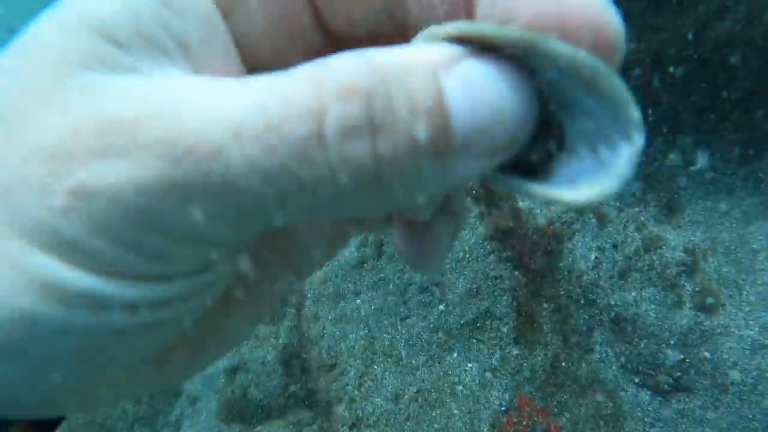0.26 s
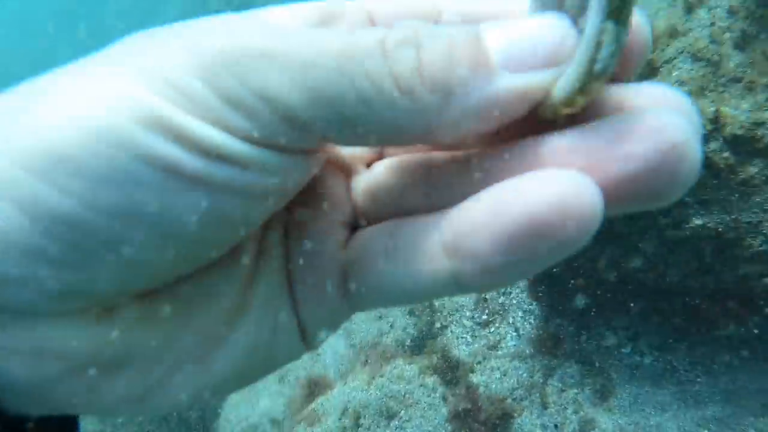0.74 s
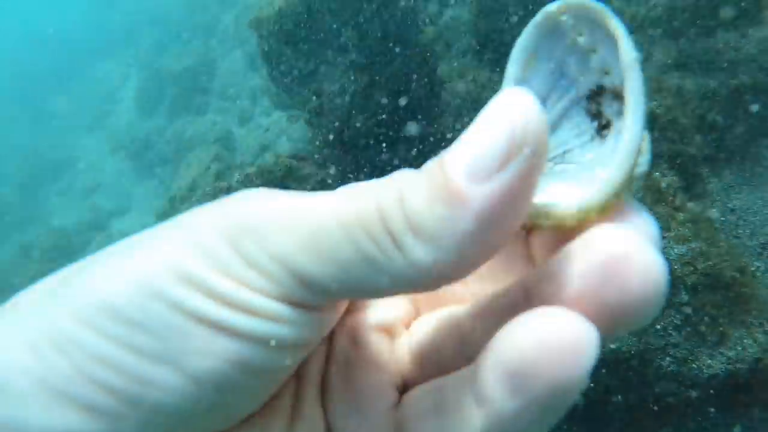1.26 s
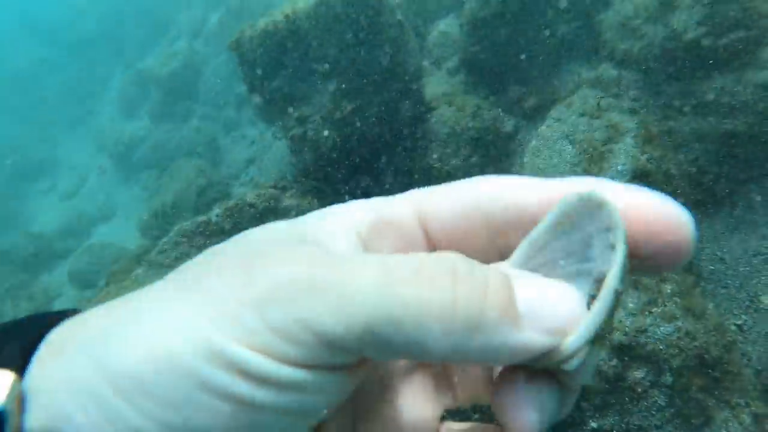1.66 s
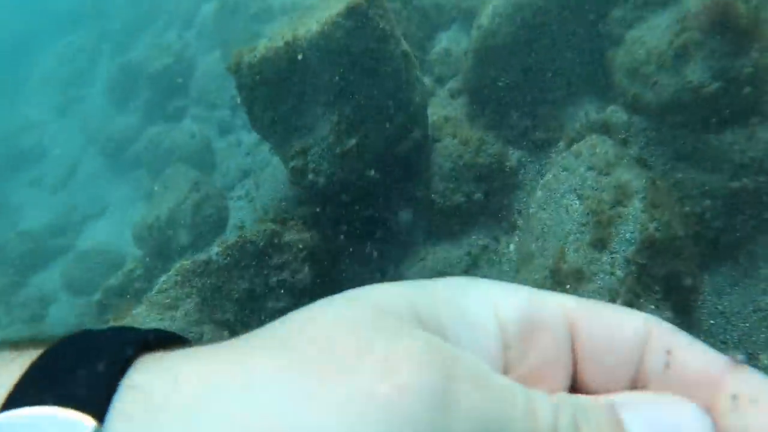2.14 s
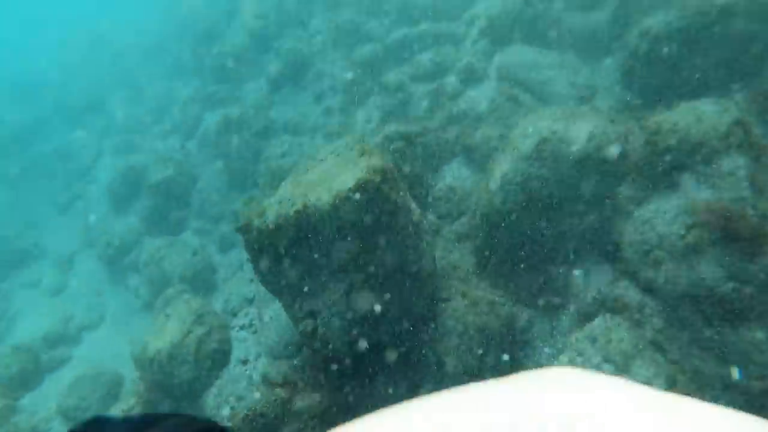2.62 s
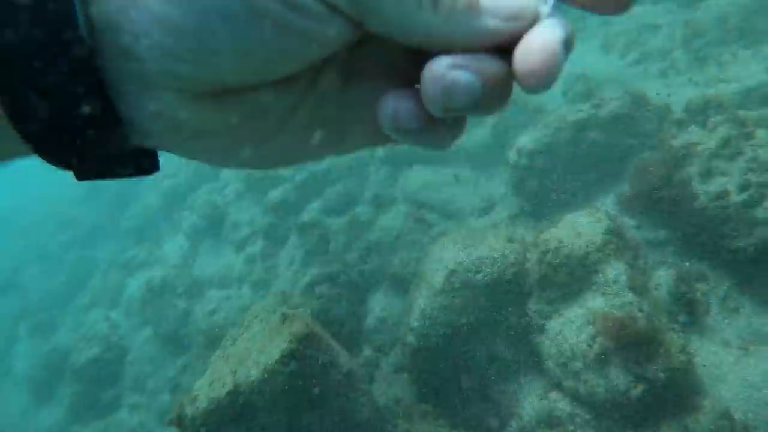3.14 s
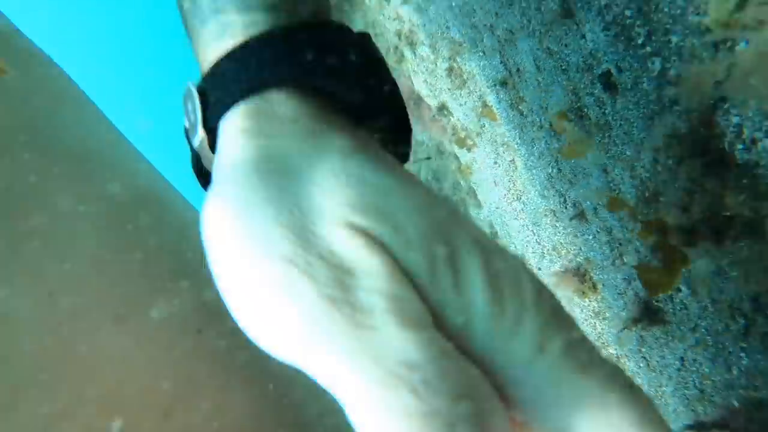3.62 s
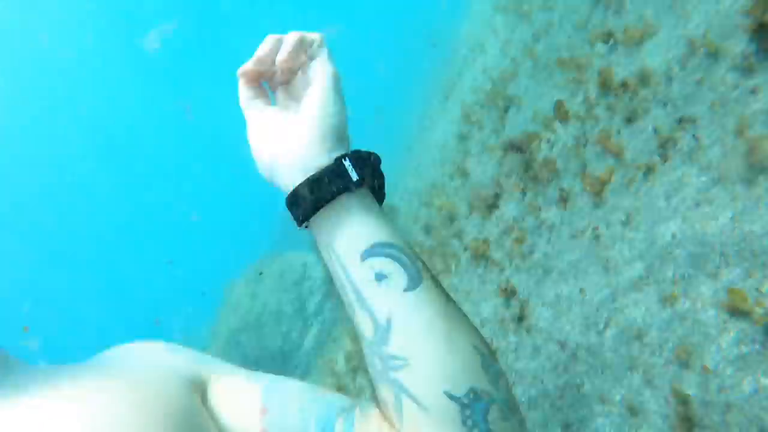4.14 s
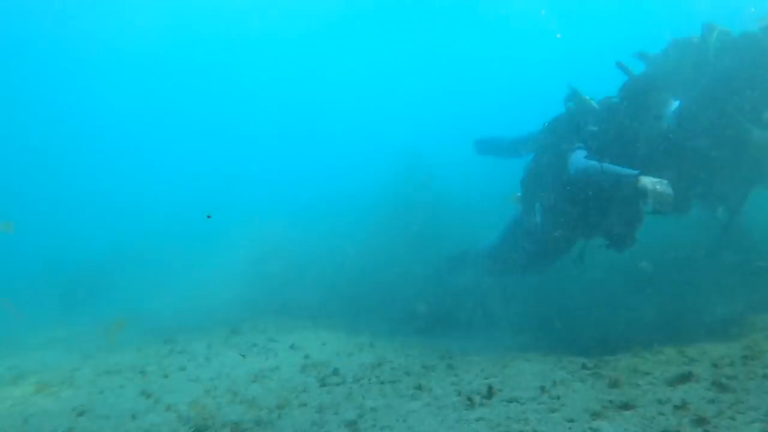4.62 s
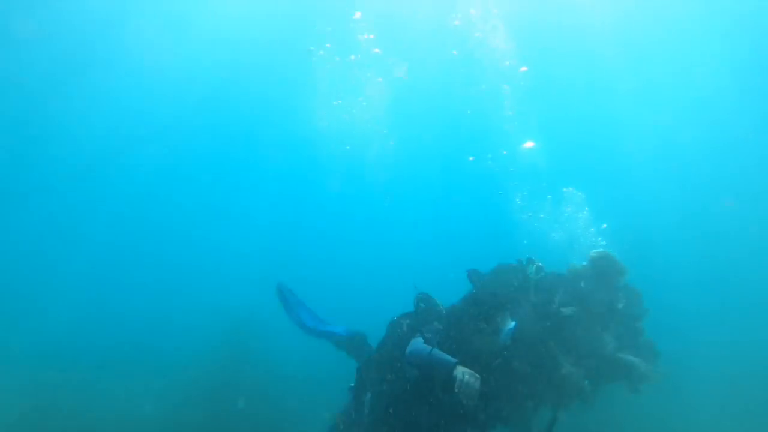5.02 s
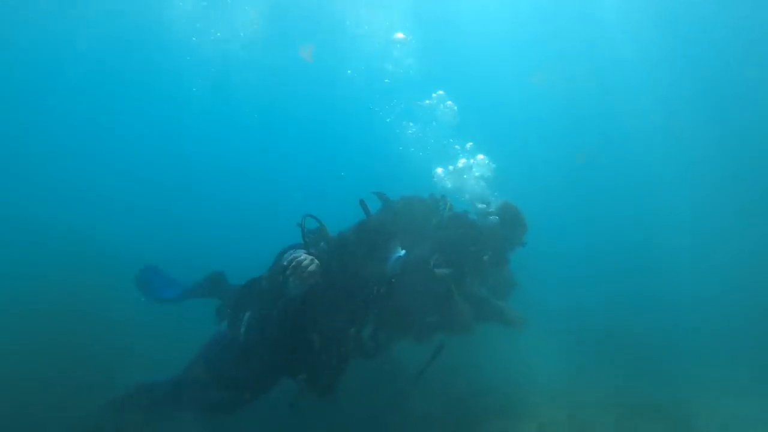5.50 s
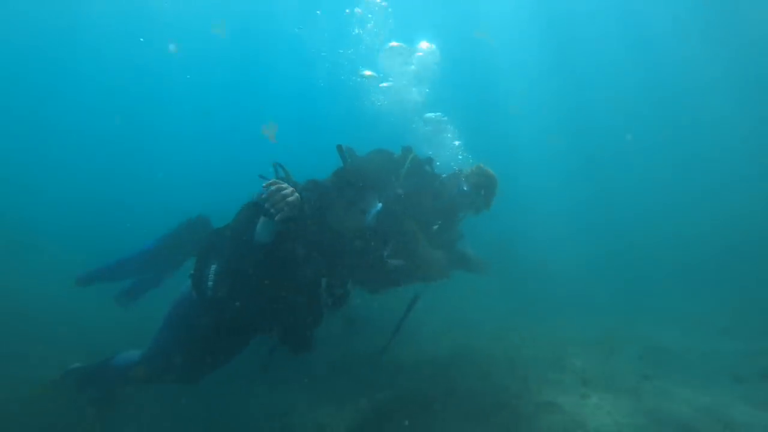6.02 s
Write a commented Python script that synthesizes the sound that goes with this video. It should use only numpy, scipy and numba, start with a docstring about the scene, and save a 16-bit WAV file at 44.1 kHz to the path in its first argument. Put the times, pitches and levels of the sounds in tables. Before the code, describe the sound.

Two joined underwater shots, both muffled and resonant. The first is quiet: low water buffeting, thin gurgle, dry little clicks and occasional hollow taps, booming more on the left. The second jumps up abruptly, leaning right, with thick bubbling, gritty scrapes, plopping bubble notes, a cluster of hard housing knocks late on, and a wavering distant drone.

```python
"""Water buffets the two flooded microphone ports of a hand-held camera in a rocky bay: noise whose low-pass
corner follows the flow. Two shots meet at a hard cut. Ringing sine bubbles, sharp snaps of noise grains, scrapes
of dense ticks and knocks on the housing come muffled through the ports, over a bed of bubble swarms; a far drone
joins in the second shot. One port keeps an air pocket that booms: the left one first, the right one after the cut.
"""
import sys
import numpy as np
from scipy import signal
from scipy.fft import rfft, irfft
from scipy.io import wavfile
from scipy.ndimage import uniform_filter1d
from numba import njit

SR = 44100
rng = np.random.default_rng(int(sys.argv[2]) if len(sys.argv) > 2 else 0)


def pcm_store(signal):
    """Save signal as 16-bit PCM."""
    levels = np.round(np.clip(np.atleast_2d(signal), -1, 1) * 32767)
    wavfile.write(sys.argv[1], SR, levels.astype(np.int16).T)


N = 276066

# Pairs of settings hold (first shot, second shot) unless noted.
CUT_S = 3.41227
JOIN_STEP = (-.022, -.073)  # sample value of (left, right) as the second shot starts

# Gusts of water over the ports: (start [s], hold [s], buffeting [dB], left minus right [dB])
FLOW_GUSTS = [(0.043, 0.17, -35.5, 34), (0.252, 0.074, -34.5, 34), (0.372, 0.026, -40, 27),
              (0.536, 0.044, -40.5, 10.5), (0.65, 0.11, -37.5, -6), (0.8, 0.031, -41, -10),
              (1.543, .03, -41, 7.5), (1.725, 0.058, -45, 9), (1.915, 0.021, -38.5, 8),
              (2.149, 0.26, -36, -9), (2.446, 0.13, -32, 5), (2.621, 0.08, -39.5, -8),
              (2.775, 0.05, -33.5, 6.5), (2.87, 0.086, -32, 10.5), (2.974, 0.23, -36, 3.5),
              (3.425, 0.024, -34.5, -10), (3.524, 0.072, -35.5, -8.5), (3.66, 0.11, -41, -10),
              (3.835, 0.099, -27.5, -30.5), (3.952, .012, -26.5, -30), (4.024, 0.027, -33, -15),
              (4.075, 0.028, -25, -42.5), (4.156, 0.05, -36, -17.5), (4.291, .38, -33.5, -24.5),
              (4.715, .25, -38.5, -28), (4.984, 0.032, -36, -14.5), (5.056, .04, -40, -18),
              (5.32, 0.025, -33, -9), (5.489, 0.087, -44.5, -11)]
# Flow between gusts, one row a shot: (buffeting [dB], left minus right [dB])
STILL_FLOW = [(-54, 9), (-52.5, -20)]
GUST_RISE_S, GUST_FALL_S = 0.024, 0.023  # time constants
FLOW_ALIKE = (0.41, 0.71)  # share of the buffeting power common to both ports

# Bed of bubbles, one table a shot: (time [s], gurgle [dB], large bubbles [dB], fizz [dB])
BUBBLE_BED = [
    [(0.0, -53.5, -59.5, -73), (0.3, -58, -64.5, -77.5), (0.9, -52.5, -64, -76), (1.5, -57, -60, -73.5),
     (1.9, -55, -53.5, -74), (2.3, -53, -66.5, -72), (2.8, -60.5, -57.5, -74.5), (3.15, -62.5, -62, -76.5),
     (3.4, -51.5, -67, -81.5)],
    [(3.42, -37, -44, -64), (3.78, -40.5, -49.5, -66), (4.3, -39.5, -42, -67.5), (4.7, -40.5, -47.5, -69.5),
     (5.2, -39, -49.5, -69.5), (5.5, -42, -47, -70.5), (5.8, -39, -47.5, -69.5), (6.26, -42, -39, -65.5)],
]
# Bursts on top of the bed: (start [s], hold [s], gurgle [dB], large bubbles [dB], fizz [dB])
BUBBLE_BURSTS = [(1.854, 0.1, -47, -55, -77.5), (3.887, 0.022, -45, -26, -75.5),
                 (4.05, 0.036, -52, -36, -70.5), (4.307, 0.021, -32, -33, -72.5),
                 (4.549, 0.055, -28.5, -29.5, -71), (5.002, 0.013, -47, -32, -72.5)]
BURST_RISE_S, BURST_FALL_S = 0.0058, 0.014  # time constants
# Brief dips in the level of bed and drone: (time [s], depth [dB], return [s])
LEVEL_DIPS = [(3.498, 9, 0.16), (3.894, 12.5, .15), (4.094, 19, 0.13), (4.668, 20.5, 0.26),
              (5.041, 18, 0.11), (5.346, 18.5, 0.15)]
DIP_FALL_S = 0.015
LARGE_APART_DB, FIZZ_APART_DB, GURGLE_APART_DB = -10.5, -4.5, -14  # part that reaches the ports unlike
POCKET_HISS_DB = (-100, -81)

# Patches of grainy crackle, as of sand and small bubbles scraping the housing:
# (start [s], length [s], level [dB], low edge [Hz], top edge [Hz])
SCRAPE_PATCHES = [(0.01, 0.023, -72, 1400, 5000), (0.289, 0.031, -75, 1490, 4800),
                  (0.476, 0.044, -77, 1390, 4520), (0.998, 0.079, -79, 1400, 6000),
                  (1.439, 0.029, -71, 1400, 4770), (1.925, 0.04, -74.5, 1370, 11000),
                  (1.499, 0.0039, -76, 2500, 12500), (2.085, 0.019, -74, 2020, 11000),
                  (2.304, 0.057, -74, 1400, 5500), (2.372, 0.035, -68.5, 1300, 9100),
                  (2.472, 0.026, -77, 1290, 4500), (3.415, 0.03, -63, 1200, 2500),
                  (3.424, 0.078, -80.5, 2600, 12000), (3.568, 0.03, -78, 1600, 6820),
                  (3.67, 0.016, -79, 2600, 12000), (3.727, 0.041, -86, 2690, 11140),
                  (3.805, 0.073, -72, 1490, 8800), (4.004, 0.026, -72.5, 1500, 6000),
                  (4.06, 0.0081, -79.5, 2590, 11000), (4.072, 0.003, -74.5, 4500, 14500),
                  (4.499, 0.056, -70, 1820, 10000), (4.574, 0.065, -76.5, 2000, 6000),
                  (5.004, 0.025, -57.5, 1100, 2700), (5.162, 0.0083, -80.5, 2600, 10900)]
SCRAPE_TICKS_PER_S, SCRAPE_APART_DB, SCRAPE_FALL_S = 600, -1, 0.007
SCRAPE_LEAN_DB = (0.5, -3.5)  # left minus right

# Single bubbles: (time [s], peak [dB], middle pitch [Hz], length [s], played no shorter than 0.008)
SINGLE_BUBBLES = [(0.166, -48.5, 1240, 0.019), (1.005, -41, 946, 0.017), (1.159, -42, 597, 0.051),
                  (1.784, -38, 680, 0.012), (1.85, -38.5, 600, 0.04), (1.9, -37.5, 604, 0.041),
                  (1.955, -40.5, 510, 0.012), (1.996, -49.5, 990, 0.031), (1.33, -51.5, 945, 0.021),
                  (1.73, -43.5, 910, 0.0061), (1.85, -48.5, 1290, 0.011), (1.925, -48.5, 904, 0.03),
                  (2.0, -51, 1420, 0.014), (3.455, -39, 797, 0.053), (3.57, -37.5, 698, 0.043),
                  (3.678, -35.5, 707, .03), (3.732, -31, 701, 0.075), (4.03, -34, 603, 0.026),
                  (4.222, -41.5, 1016, 0.035), (4.64, -38, 1144, 0.024), (4.414, -32.5, 620, 0.028),
                  (4.484, -30.5, 524, 0.038), (4.893, -29, 560, 0.03), (4.912, -33, 593, 0.018),
                  (4.94, -62, 1400, 0.022), (5.025, -27, 685, 0.015), (5.18, -27, 843, 0.013),
                  (5.208, -33, 676, 0.066), (5.266, -32.5, 705, 0.038), (4.635, -27.5, 659.4, 0.05),
                  (4.976, -28, 654, 0.021), (5.01, -27.5, 451, 0.037), (5.164, -29.5, 719, 0.047),
                  (5.598, -28.5, 636, 0.071), (5.729, -34, 660, 0.045), (5.863, -38.5, 678, 0.03),
                  (5.909, -35, 642, 0.061), (5.948, -31.5, 640, 0.039), (6.171, -31, 639, 0.053)]
# Sharp snaps, and bright cracks of some knocks: (time [s], crack peak [dB], ring peak [dB])
SHARP_SNAPS = [(0.255, -60, -46.5), (0.2923, -49, -67), (0.414, -64, -45.5), (0.4882, -58.5, -63),
               (0.54, -60.5, -44.5), (0.6553, -55.5, -53), (0.7847, -63.5, -40.5), (0.818, -61, -42),
               (0.8626, -61.5, -37), (0.9061, -55.5, -43), (1.033, -60, -61), (1.0456, -52, -38),
               (1.088, -53, -37.5), (1.2262, -55.5, -48), (1.2743, -52.5, -35), (1.3028, -47.5, -35.5),
               (1.438, -77, -40.5), (1.4731, -61, -52), (1.499, -68, -44), (1.6373, -55, -41),
               (1.8174, -60.5, -40.5), (2.0839, -55, -64), (2.1233, -58, -53), (2.2515, -71, -52),
               (2.3171, -54.5, -63), (2.375, -57, -62), (2.41, -62, -53), (2.5194, -58.5, -58),
               (2.585, -53, -43), (2.6236, -58, -48), (2.6795, -62.5, -58), (2.739, -57, -55.5),
               (2.7943, -71, -61), (2.8406, -62, -52), (2.8801, -64, -49), (2.9769, -55.5, -41),
               (3.125, -65.5, -62.5), (3.1725, -62.5, -66), (3.2866, -64, -58), (3.3046, -63.5, -56),
               (3.3714, -63.5, -60), (3.488, -67, -40), (3.4965, -52, -38), (5.854, -58, -37),
               (6.009, -55, -49), (6.082, -49.5, -32)]
# Knocks on the housing: (time [s], ring peak [dB], thump peak [dB], crack peak [dB])
HOUSING_KNOCKS = [(0.321, -33.5, -40, -72), (1.108, -27, -53.5, -61), (1.524, -28.5, -41.5, -71),
                  (1.563, -26, -43, -81), (3.4958, -16.5, -20.5, -39), (3.816, -34, -37, -58),
                  (3.96, -27.5, -42, -71.5), (4.22, -35, -49, -80), (4.295, -27, -32, -75),
                  (4.466, -27, -42, -67), (4.559, -18.5, -71, -45), (4.829, -35.5, -44.5, -58),
                  (4.896, -44, -49, -68.5), (5.002, -20.5, -34, -49.5), (5.269, -24.5, -40, -88),
                  (5.299, -13.5, -25, -44.5), (5.32, -16.5, -37.5, -56), (5.338, -15, -27.5, -86)]
THUMP_HZ, THUMP_DROP_HZ, THUMP_DROP_S = 122, 89, 0.0035  # starts higher and sags to its pitch
# Far drone that wavers, second shot: (time [s], level [dB])
FAR_DRONE = [(3.42, -51.5), (3.9, -49), (4.25, -46.5), (5.0, -47.5), (5.55, -47.5), (5.75, -55.5),
             (5.9, -45), (6.26, -40.5)]

# Colour of what the water carries, one table a shot: (frequency [Hz], level [dB])
WATER_COLOUR = [
    [(100, 17), (400, 2.5), (700, -3), (1250, -2.5), (1550, -4.5), (1900, 0), (2200, -7.5), (4000, 3),
     (6500, 0), (8500, -2.5), (14000, -22.5)],
    [(100, -2.5), (400, 9), (700, -8), (1450, -6.5), (1900, -5), (2250, -10.5), (3000, -17), (4500, -5),
     (12000, -4.5), (14500, -22)],
]
# Port resonances, one row a shot: (membrane [Hz], its Q when flooded, its Q with pocket,
# pocket [Hz], Q, pocket level [dB], pocket lag [s], direct level [dB], whistle [Hz], Q, whistle level [dB],
# corner above which the flooded port goes dull [Hz], Q, treble that leaks past [dB])
PORT_RESONANCES = [(980, 12.5, 6.8, 600, 4.2, 12.5, 0.00018, -1, 2494, 29, 11.5, 4060, 0.87, -6),
                   (990, 9.6, 6.4, 687.8, 10.3, 11.5, 0.00012, 3, 2400, 7.8, 1.5, 4120, 1.58, -18.5)]
LEAK_HZ, LEAK_Q = 10000, 5  # thin ring of the flooded port
TOP_HZ = 16000


def undb(db):
    """Amplitude from dB."""
    return 10 ** (np.asarray(db) / 20)


def curves(table):
    """Columns of a table, joined by straight lines."""
    s, *columns = np.transpose(table)
    return [np.interp(np.arange(N) / SR, s, c) for c in columns]


def in_shot(table, shot):
    """Rows of a table that fall in one shot."""
    return [row for row in table if (row[0] > CUT_S) == shot]


def band(x, lo, hi):
    """Butterworth band-pass."""
    return signal.sosfilt(signal.butter(3, (lo, hi), "bandpass", fs=SR, output="sos"), x)


def unit(x):
    """Scales a sound to rms 1."""
    return x / np.sqrt(np.mean(x ** 2))


def add(out, s, grain):
    """Mixes a grain in at a time in seconds."""
    i = int(s * SR)
    out[i:i + len(grain)] += grain[:N - i]


def walk(rate):
    """Random levels held 1 / rate s and slewed twice."""
    k = int(SR / rate)
    steps = np.repeat(rng.standard_normal(N // k + 1), k)
    return uniform_filter1d(uniform_filter1d(steps, k), k)[:N]


def heavy(u):
    """Exponential chance from uniform chance, with the rarest giants cut off."""
    return np.minimum(-np.log(1 - u), 3.5)


def ticks(rate, scatter_db):
    """Random impulses, most small and a few large."""
    when, size, sign = rng.random((3, N))
    return unit((when < rate / SR) * undb(scatter_db * heavy(size)) * np.sign(sign - .5))


def swell(start, hold, rise, fall):
    """Gain of one event: grows up to its start, holds, dies away."""
    t = np.arange(N) / SR - start
    return np.exp(np.minimum(t, 0) / rise - np.maximum(t - hold, 0) / fall)


def heard(source, pair, lo, hi, peak=False):
    """Scales a source so that the middle of what the ports pass has rms 1 (or peak 1) in a band."""
    mid = band(signal.fftconvolve(source, pair.mean(axis=0)), lo, hi)
    level = np.abs(mid).max() if peak else np.sqrt(np.mean(mid ** 2))
    return source / level


def apart(x, db):
    """A spread-out crowd: a share of it differs between the ports."""
    return x + undb(db) * np.roll(x, N // 3) * np.array([[1], [-1]])


def split(mid_db, pan_db, alike):
    """Power at (left, right) of a flow with this middle level and lean."""
    left = 1 / (1 + undb(-2 * pan_db))
    shares = np.array([[left], [1 - left]])
    return 4 * undb(2 * mid_db) * shares / (1 + 2 * alike * np.sqrt(left * (1 - left)))


@njit
def lowpass(x, hz, damp):
    """State-variable low-pass whose corner moves."""
    y, b, l = np.empty(len(x)), 0., 0.
    for i in range(len(x)):
        g = np.tan(np.pi * hz[i] / SR)
        v = (b + g * (x[i] - l)) / (1 + g * (g + damp))
        y[i] = l + g * v
        b, l = 2 * v - b, l + 2 * g * v
    return y


def flow(shot):
    """Eddies shed unevenly at each port; stronger flow sheds smaller, brighter eddies."""
    alike = FLOW_ALIKE[shot]
    power = split(*STILL_FLOW[shot], alike)
    for s, hold, db, pan_db in FLOW_GUSTS:
        power = power + split(db, pan_db, alike) * swell(s, hold, GUST_RISE_S, GUST_FALL_S) ** 2
    eddies = [ticks(70, 1.6) + 0.48 * rng.standard_normal(N) for _ in range(3)]  # left, right, common
    out = []
    for port, gain in enumerate(np.sqrt(power)):
        push = np.sqrt(alike) * eddies[2] + np.sqrt(1 - alike) * eddies[port]
        hz = np.clip((100, 120)[shot] * (gain / undb(-29.0)) ** (.35, .45)[shot], 62, 700)
        soft = band(lowpass(lowpass(push, hz, 1.26), 1.78 * hz, 0.98), 15, 1600)
        soft = soft / np.sqrt(hz)  # a wider band carries more power
        recent_power = uniform_filter1d(soft ** 2, SR // 25)
        # partly evens out the loudness, so each gust keeps near its set level
        out.append(gain * unit(soft / (recent_power + 1e-12) ** .3))
    return np.array(out)


def dips():
    """Level offset in dB: quick drops at set times, each creeping back."""
    t = np.arange(N) / SR
    return sum(np.interp(t - s, (0, DIP_FALL_S, DIP_FALL_S + back), (0, -db, 0))
               for s, db, back in LEVEL_DIPS)


def bubbling(shot):
    """Levels in dB of gurgle, large bubbles and fizz: the dipping bed, with the bursts on top."""
    power = undb(2 * (np.array(curves(BUBBLE_BED[shot])) + dips()))
    for s, hold, *db in BUBBLE_BURSTS:
        power = power + np.outer(undb(db), swell(s, hold, BURST_RISE_S, BURST_FALL_S)) ** 2
    return 10 * np.log10(power)


def bubble(hz, length, glide):
    """A ringing air bubble whose pitch rises as it leaves."""
    t = np.arange(int(length * SR)) / SR
    ring = np.sin(2 * np.pi * hz * t * (1 + glide * (t / length - 1) / 2))
    return ring * np.sin(np.pi * (t / length) ** 0.53) ** 2


def swarm(lo_hz, hi_hz, cycles, scatter_db, count):
    """A random crowd of bubbles; higher ones tend to ring shorter."""
    out = np.zeros(N)
    for s, pitch, size, long in rng.random((count, 4)):
        hz = lo_hz * (hi_hz / lo_hz) ** pitch
        grain = bubble(hz, cycles * (0.38 + long) / hz, 0.27)
        add(out, s * N / SR, undb(scatter_db * heavy(size)) * grain)
    return unit(out)


def large_bubbles(shot):
    """Low, big bubbles: a swarm of slow rings over a low band of noise."""
    rumble = unit(band(rng.standard_normal(N), 120, 450))
    return swarm((280, 220)[shot], 474.5, 6.46, 4.9, count=450) + 0.75 * rumble


def gurgle(shot):
    """Mid-sized bubbles: a swarm over noise that flickers in level."""
    noise = unit(band(rng.standard_normal(N), (450, 580)[shot], 1400))
    flicker = undb(4.9 * walk(30))
    return swarm((480, 580)[shot], 1307, 12.1, 2.0, count=900) + (.9, .7)[shot] * noise * flicker


def fizz(shot):
    """Fine bubbles: clustered crackle, a quiet swarm of small rings and flickering bright noise."""
    t = np.arange(SR // 50) / SR
    rattle = rng.standard_normal(len(t)) ** 3 * np.exp(-t / .004)  # follows each tick
    clusters = undb(6.0 * walk(20))
    crackle = unit(signal.fftconvolve(ticks((110, 260)[shot], 3.5) * clusters, rattle)[:N])
    small = .14 * swarm(1150, 2600, 10, 2.2, count=600)
    flicker = undb((5.0, 4.6)[shot] * walk(30))
    spray = (.45, .75)[shot] * band(rng.standard_normal(N) * flicker, 1100, 12000)
    return band(crackle, 1900, (9500, 12000)[shot]) + small + spray


def bubble_bed(shot, pair):
    """Gurgle, large bubbles and fizz at their moving levels, each partly unlike at the two ports."""
    gurgle_db, large_db, fizz_db = bubbling(shot)
    low = undb(large_db) * apart(heard(large_bubbles(shot), pair, 260, 840), LARGE_APART_DB)
    middle = undb(gurgle_db) * apart(heard(gurgle(shot), pair, 300, 1500), GURGLE_APART_DB)
    high = undb(fizz_db) * apart(heard(fizz(shot), pair, 1122, 11000), FIZZ_APART_DB)
    return low + middle + high


def pocket_hiss(shot):
    """Gritty hiss in the booming port, rising and falling with the fizz."""
    fizz_gain = unit(undb(bubbling(shot)[2]))
    grit = ticks(1600, 3) * undb(3.5 * walk(40))
    hiss = unit(band(grit, 3400, 7800) + .45 * band(grit, 7800, 12500))
    return undb(POCKET_HISS_DB[shot]) * fizz_gain * hiss


def scrapes(shot, pair):
    """Each patch is a dense run of uneven ticks, strongest at its start, partly unlike at the two ports."""
    out = np.zeros((2, N))
    t = np.arange(SR // 5) / SR
    lean_db = SCRAPE_LEAN_DB[shot]
    for s, length, db, lo_hz, top_hz in in_shot(SCRAPE_PATCHES, shot):
        when, size, sign = rng.random((3, 2, len(t)))
        grit = (when < SCRAPE_TICKS_PER_S / SR) * undb(-2.4 * np.log(1 - size)) * np.sign(sign - .5)
        shape = np.exp(-.6 * t / length - np.maximum(t - length, 0) / SCRAPE_FALL_S)
        steady = band(grit[0], lo_hz, top_hz)  # sets the level before shaping
        scale = heard(steady, pair, lo_hz, top_hz).std() / steady.std()
        mid, side = undb(db) * scale * band(grit * shape, lo_hz, top_hz)
        side = undb(SCRAPE_APART_DB) * side
        add(out[0], s, undb(lean_db / 2) * (mid + side))
        add(out[1], s, undb(-lean_db / 2) * (mid - side))
    return out


def single_bubbles(shot, pair):
    """Lone air bubbles, each singing a short rising note."""
    out = np.zeros(N)
    for s, db, hz, length in in_shot(SINGLE_BUBBLES, shot):
        note = bubble(hz, max(length, .008), 0.19)
        add(out, s, undb(db) * heard(note, pair, 450, 1300, peak=True))
    return out


def crack(pair, dull_hz, reach, spread_s):
    """An uneven burst of noise grains with its own length and brightness."""
    long, bright = rng.random(2)
    t = np.arange(SR // 20) / SR
    grains = rng.standard_normal(len(t)) ** 3 * np.exp(-t / (spread_s * (0.37 + long)))
    top_hz = min(dull_hz * reach ** bright, 20000)
    return heard(band(grains, 1300, top_hz), pair, 1500, 5000, peak=True)


def snaps(shot, pair):
    """Sharp snaps, and bright cracks of some knocks: noise grains, and an impulse that rings the ports."""
    click = signal.unit_impulse(SR // 20)
    ring = heard(band(click, 550, 1800), pair, 290, 1300, peak=True)
    out = np.zeros(N)
    for s, crack_db, ring_db in in_shot(SHARP_SNAPS, shot):
        add(out, s, undb(ring_db) * ring + undb(crack_db) * crack(pair, 3900, 2.0, 0.006))
    return out


def knocks(shot, pair):
    """Knocks on the housing: a soft push rings the ports, with a sagging low thump and a crack."""
    t = np.arange(SR // 20) / SR
    contact = np.sin(np.pi * np.minimum(t / 0.0012, 1)) ** 2
    push = heard(band(contact, 300, 5400), pair, 240, 1000, peak=True)  # sprung back by the housing
    thump_hz = THUMP_HZ + THUMP_DROP_HZ * np.exp(-t / THUMP_DROP_S)
    thump = np.sin(2 * np.pi * np.cumsum(thump_hz) / SR) * np.exp(-t / 0.015)
    thump = heard(thump, pair, 91, 300, peak=True)
    out = np.zeros(N)
    for s, ring_db, thump_db, crack_db in in_shot(HOUSING_KNOCKS, shot):
        edge = undb(crack_db) * crack(pair, 4000, 1.2, 0.0027)
        add(out, s, undb(ring_db) * push + undb(thump_db) * thump + edge)
    return out


def drone(pair):
    """A far low hum: narrow noise held steady over an eighth of a second, then given its wavering level."""
    hum = band(rng.standard_normal(N), 72, 125)
    hum = hum / np.sqrt(uniform_filter1d(hum ** 2, SR // 8))
    return undb(curves(FAR_DRONE)[0] + dips()) * heard(hum, pair, 60, 110)


def spring(f, hz, q):
    """Response of a damped mass on a spring: passes lows, peaks near hz, dulls above."""
    return 1 / (1 - (f / hz) ** 2 + 1j * f / hz / q)


def ports(shot, size=8192):
    """Impulse responses from sound in the water to (left, right): water colour, membrane, pocket or flooding."""
    f = np.maximum(np.arange(size // 2 + 1) * SR / size, 1)
    (membrane_hz, flooded_q, pocketed_q, pocket_hz, pocket_q, pocket_db, lag_s, direct_db,
     whistle_hz, whistle_q, whistle_db, dull_hz, dull_q, leak_db) = PORT_RESONANCES[shot]
    hz, db = np.transpose(WATER_COLOUR[shot])
    cepstrum = irfft(np.log(undb(np.interp(np.log(f), np.log(hz), db))))
    cepstrum[1:size // 2] *= 2  # folded cepstrum: causal colour
    cepstrum[size // 2 + 1:] = 0
    water = np.exp(rfft(cepstrum))
    pocket = undb(pocket_db) * spring(f, pocket_hz, pocket_q) * np.exp(-2j * np.pi * f * lag_s)
    whistle = undb(whistle_db) * spring(f, whistle_hz, whistle_q) * 1j * f / whistle_hz / whistle_q
    booming = spring(f, membrane_hz, pocketed_q) * (undb(direct_db) + pocket + whistle)
    leak = undb(leak_db) * spring(f, LEAK_HZ, LEAK_Q)
    flooded = spring(f, membrane_hz, flooded_q) * (spring(f, dull_hz, dull_q) ** 2 + leak)
    pair = np.array([booming, flooded])[::1 - 2 * shot]  # the second shot swaps the sides
    return irfft(water * pair)[:, :size // 2]


def take(shot):
    """One shot: the water's sounds through its ports, buffeting, and hiss in the booming port."""
    pair = ports(shot)
    water = bubble_bed(shot, pair) + scrapes(shot, pair)
    water = water + single_bubbles(shot, pair) + snaps(shot, pair) + knocks(shot, pair)
    if shot == 1:
        water = water + drone(pair)
    sound = signal.fftconvolve(water, pair, axes=1)[:, :N] + flow(shot)
    sound[shot] += pocket_hiss(shot)
    return sound


def scene():
    """The two shots, butted together with a small jump."""
    after = np.arange(N) / SR - CUT_S
    settle = np.exp(-np.abs(after) / .0014)
    first = take(0) * (1 - settle)
    second = take(1) * (1 - settle) + np.outer(JOIN_STEP, settle)
    return np.where(after < 0, first, second)


def record(dry):
    """A faint electronic hiss, then the top is cut."""
    hiss = undb(-106) * rng.standard_normal(dry.shape)
    return signal.sosfilt(signal.ellip(8, .2, 70, TOP_HZ, fs=SR, output="sos"), dry + hiss)


dry = scene()
out = record(dry)
pcm_store(out)
```